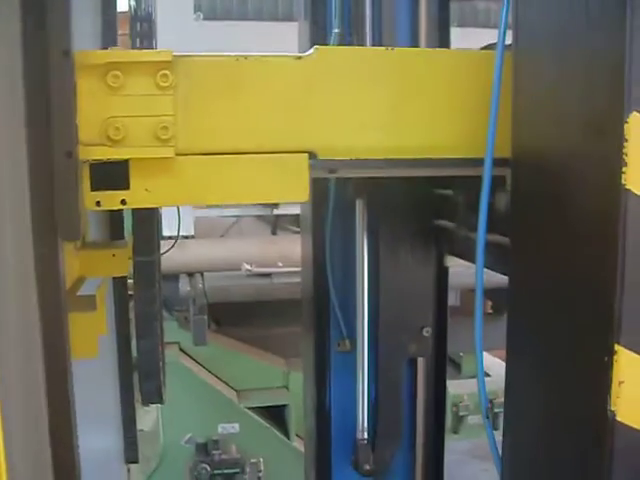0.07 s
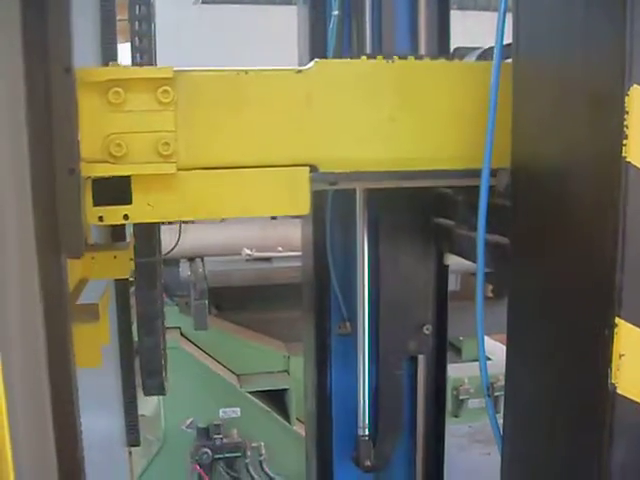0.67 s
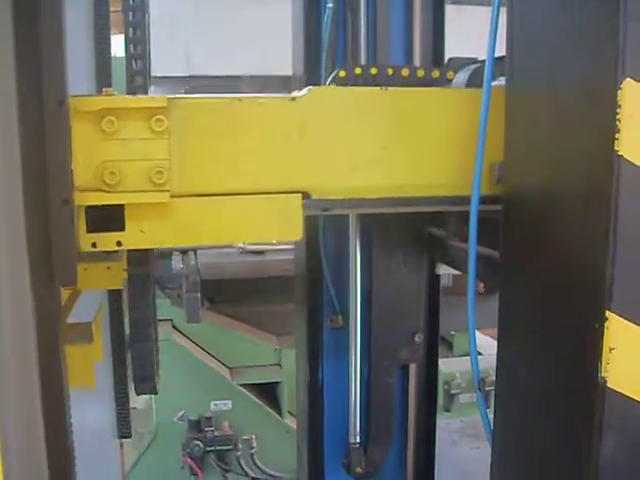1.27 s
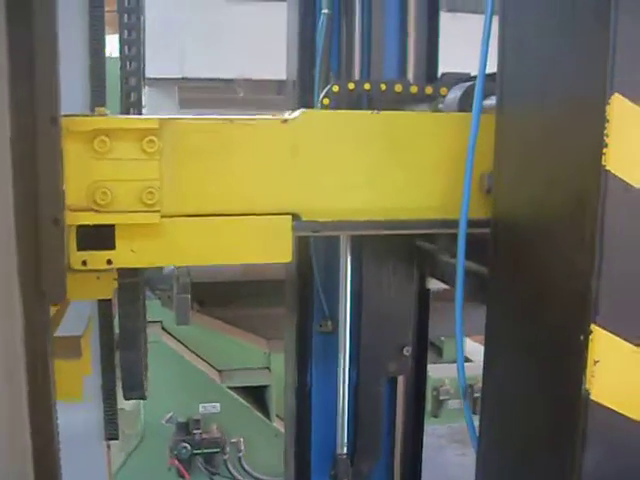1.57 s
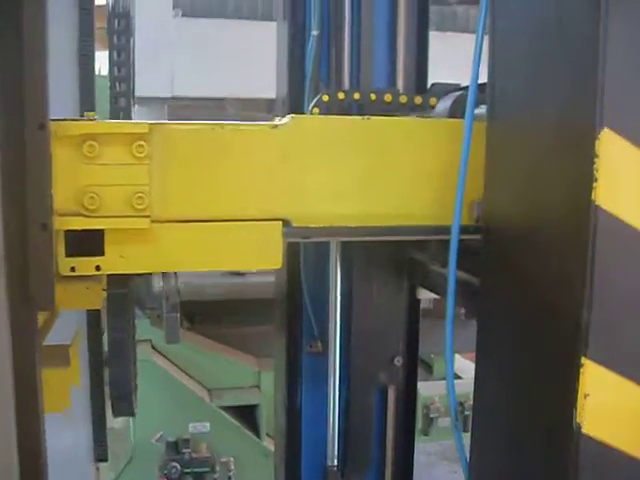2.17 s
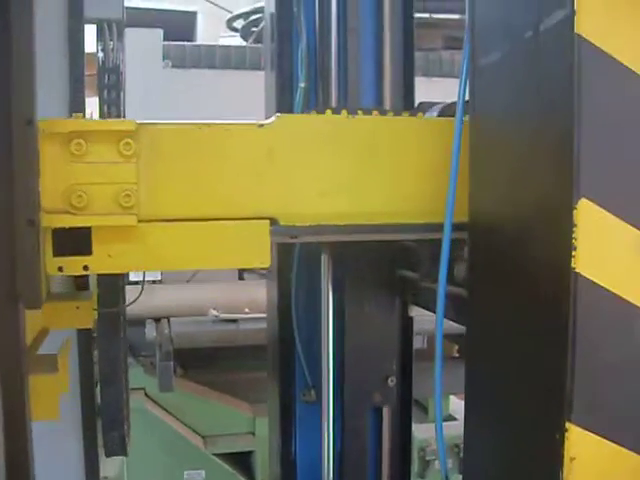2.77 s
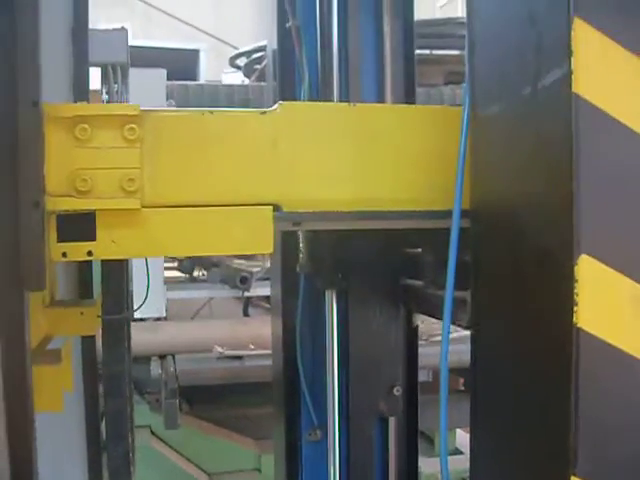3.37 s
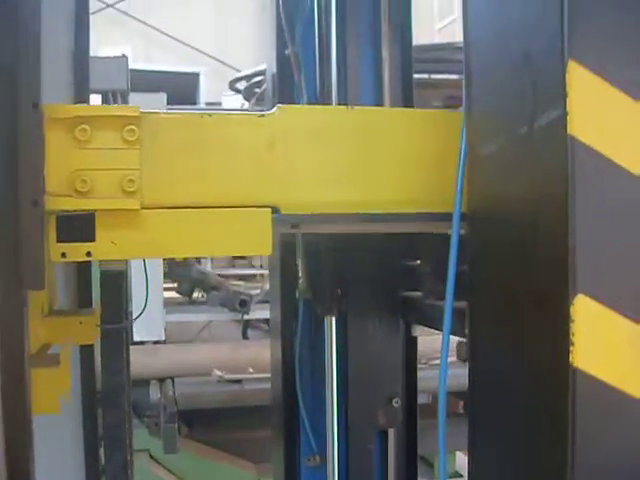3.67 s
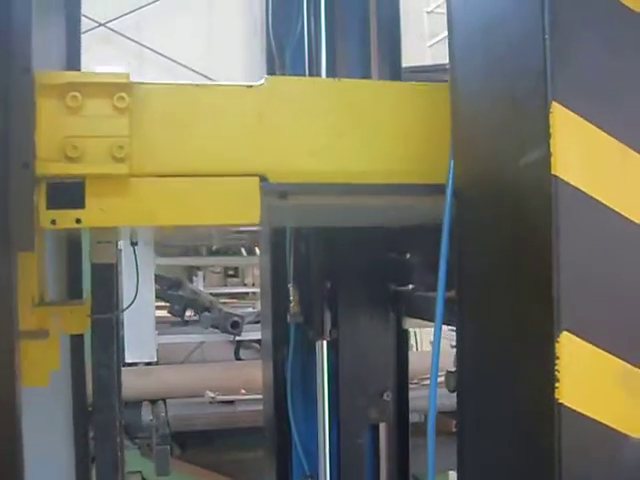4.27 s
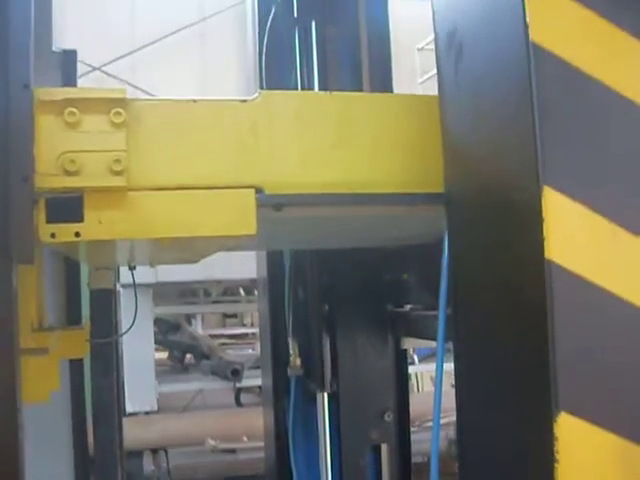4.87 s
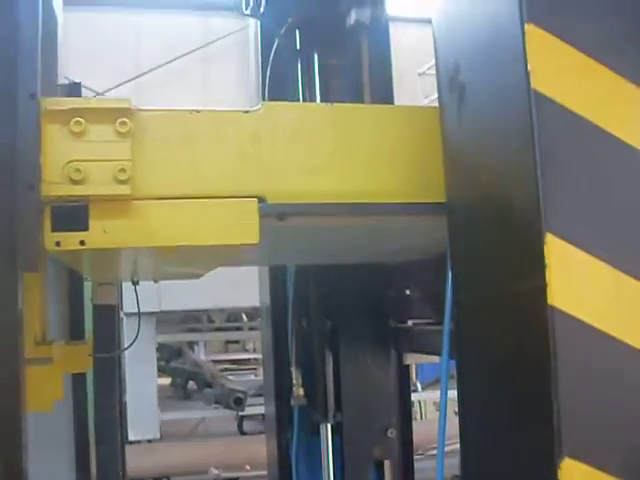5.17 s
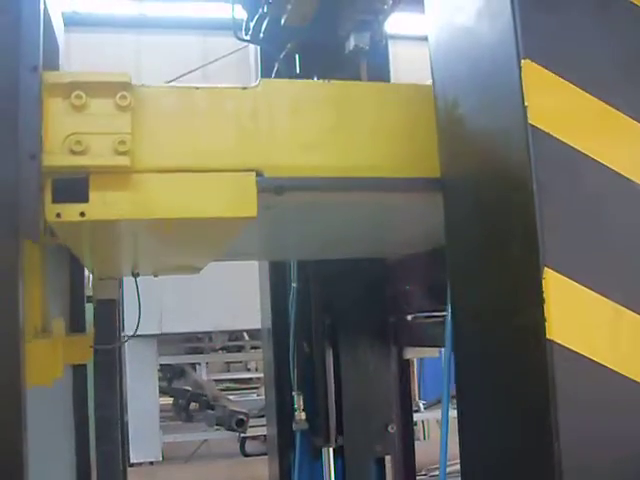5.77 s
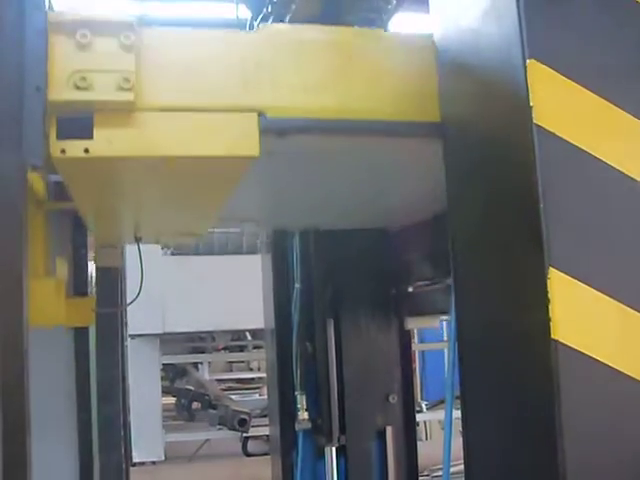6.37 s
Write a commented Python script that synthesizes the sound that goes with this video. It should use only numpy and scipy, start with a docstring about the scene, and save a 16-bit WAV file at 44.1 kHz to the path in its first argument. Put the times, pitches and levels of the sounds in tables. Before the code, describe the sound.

A loud hiss of air escapes an industrial press, followed by a steady pump hum and a couple of metal clunks.

```python
"""Industrial press: air release and ram stroke.

Air vents through a silencer: a loud hiss that dies away, whistling in the exhaust port.
A piston pump hums and rasps over workshop fans, motor tones and a thin drive whine.
From 1.5 s the valves shift with two clunks; a second pump takes the load and oil rushes.
The ram creeps, then rises at full speed, ticking faintly in its guide."""
import sys
import numpy as np
from scipy import signal
from scipy.fft import rfft, irfft, next_fast_len
from scipy.io import wavfile

SR = 44100
rng = np.random.default_rng(int(sys.argv[2]) if len(sys.argv) > 2 else 0)


def generate_wav(sig):
    """Save sig (samples, or channels by samples) to the path in sys.argv[1] as 16-bit PCM at SR."""
    pcm = np.round(np.clip(np.atleast_2d(sig).T, -1, 1) * 32767).astype(np.int16)
    wavfile.write(sys.argv[1], SR, pcm)


N = 283563
TIME = np.arange(N) / SR
FIRST_PUMP_HZ, SECOND_PUMP_HZ = 222.25, 216.1  # nominal piston stroke rates
VALVE_OPEN_S = 2.02


def gain_of(db):
    """Decibels to amplitude."""
    return 10 ** (np.asarray(db) / 20)


def unit_rms(x):
    """Scales to rms 1."""
    return x / np.sqrt(np.mean(x ** 2) + 1e-20)


def curve_at(points, hz):
    """Interpolates (freq_hz, value) points on a log-frequency axis."""
    freqs_hz, values = np.transpose(points)
    return np.interp(np.log(hz + 1), np.log(freqs_hz + 1), values)


def bell(f, hz, width_hz):
    """Gain of a resonance, 1 at its peak."""
    return 1 / (1 + (2 * (f - hz) / width_hz) ** 2)


def ramp(start_s, length_s):
    """Linear rise from 0 to 1."""
    return np.clip((TIME - start_s) / length_s, 0, 1)


def since(start_s):
    """Seconds since start_s; 0 before it."""
    return np.maximum(TIME - start_s, 0)


def add(mix, start_s, sound):
    """Mixes a sound in at start_s."""
    part = mix[round(start_s * SR):][:len(sound)]
    part += sound[:len(part)]


def lowpass(x, hz):
    """Zero-phase low-pass."""
    return signal.sosfiltfilt(signal.butter(2, hz, fs=SR, output="sos"), x)


def colour(x, gain):
    """Filters by a gain per frequency bin; rms 1."""
    return unit_rms(irfft(rfft(x) * gain, len(x)))


def noise(gain_at):
    """Steady noise shaped by gain_at(freq_hz); rms 1."""
    size = next_fast_len(N, real=True)
    spectrum = rng.standard_normal((size // 2 + 1, 2)) @ [1, 1j]
    return unit_rms(irfft(spectrum * gain_at(np.fft.rfftfreq(size, 1 / SR)), size)[:N])


def drift(rate_hz, hop=32):
    """Random wander up to about rate_hz; rms 1."""
    count = N // hop + 2
    f = np.fft.rfftfreq(count, hop / SR)
    slow = colour(rng.standard_normal(count), np.exp(-(f / rate_hz) ** 2))
    return np.interp(np.arange(N) / hop, np.arange(count), slow)


def plate_echoes(x, spread_s, share, count=24):
    """Early echoes between steel plates comb the sound into narrow peaks; rms 1."""
    delays_s, signs = rng.random(count) * spread_s, rng.choice([-1, 1], count)
    echoes = sum(sign * np.roll(x, round(delay_s * SR)) for delay_s, sign in zip(delays_s, signs))
    return unit_rms(x + share / np.sqrt(count) * echoes)


def air_left(from_s=0.62, empty_s=1.0):
    """The last air runs out, 1 to 0."""
    return 1 - ramp(from_s, empty_s - from_s)


def valve_opening(travel_s=0.28):
    """Oil valve position, 0 to 1."""
    return ramp(VALVE_OPEN_S - travel_s, travel_s)


def ram_speed(creep=0.23):
    """Share of full speed: rest, creep as the valve opens, then run-up."""
    return creep * valve_opening() + (1 - creep) * ramp(start_s=3.34, length_s=0.57)


def treble_db(hz, lift_db=1.43, fade_db_per_s=2.5):
    """Machine tones above 1500 Hz stand out at first and fade late in the stroke."""
    return (hz > 1500) * (lift_db - fade_db_per_s * since(4))


def air_jet(level_db=-17.5, drain_db_per_s=72, knee_s=0.075, flutter_db=0.37, sizzle_s=0.025):
    """Turbulence in the silencer: sizzles at full pressure; the treble fades faster than the body."""
    # jet spectrum at full pressure: freq_hz, density_db
    spectrum = [(60, -40), (150, -40), (300, -27), (700, -23.5), (1150, -27), (1450, -18.5), (2600, -12.5),
                (4400, -3), (5500, 1), (6800, -0.9), (8200, -3.5), (9400, 0.5), (10500, -5.5), (11100, -14),
                (11800, -18), (12300, -32)]
    # silencer shell resonances: freq_hz, width_hz, lift_db
    shell = [(3250, 460, 5), (6510, 350, 6), (7080, 220, 4.5), (9050, 300, 1), (10300, 300, 4)]
    jet = noise(lambda f: gain_of(curve_at(spectrum, f) + sum(db * bell(f, hz, w) for hz, w, db in shell)))
    jet = plate_echoes(jet, spread_s=0.05, share=0.51)
    body = lowpass(jet, hz=2400)
    sizzle = 1.4 * (jet - lowpass(jet, hz=10300)) * np.exp(-TIME / sizzle_s)
    fall_db = -drain_db_per_s * TIME ** 2 / (TIME + knee_s)
    hiss = (jet - body + sizzle) * gain_of(fall_db) + body * gain_of(0.47 * fall_db)
    return hiss * air_left() * gain_of(level_db + flutter_db * drift(61))


def port_whistle(peak_db=-28.5, swell_db=3, break_s=0.33, drop_db=4, fade_db_per_s=62, sputter_db=0.9):
    """The jet sputters over the port's edge and sings: swells as the air slows, breaks off, dies."""
    # port resonances: freq_hz, width_hz, relative_db, slow_air_loss_db
    port = [(4920, 380, -7, 2), (5240, 400, -2.5, 3.5), (5350, 420, 2.5, 1.5)]
    slowed = ramp(break_s, 0.09)
    whistle = sum(gain_of(db - loss_db * slowed) * noise(lambda f: bell(f, hz, width_hz))
                  for hz, width_hz, db, loss_db in port)
    whistle = plate_echoes(whistle, spread_s=0.025, share=0.51)
    level_db = peak_db - swell_db * (1 - ramp(0, 0.26))
    level_db -= drop_db * ramp(break_s, 0.031) + fade_db_per_s * since(break_s)
    return whistle * air_left() * gain_of(level_db + sputter_db * drift(60))


def stroke_count(hz, wander):
    """Running count of piston strokes at a slightly unsteady rate."""
    return np.cumsum(hz * (1 + wander * drift(2.54))) / SR


def piston_ripple(strokes, harmonics, waver_db, jitter_rad):
    """Pressure ripple of a pump: harmonics whose balance shifts with ram speed."""
    speed, ripple = ram_speed(), np.zeros(N)
    for k, rest_db, moving_db in harmonics:
        level_db = rest_db + (moving_db - rest_db) * speed + treble_db(k * FIRST_PUMP_HZ)
        level_db += waver_db * drift(7.4)
        phase = 2 * np.pi * (k * strokes + rng.random()) + jitter_rad * drift(25)
        ripple += gain_of(level_db) * np.sqrt(2) * np.cos(phase)
    return ripple


def first_pump(strokes, venting_db=5.5, strain_db=5.5, shift_s=1.52, build_s=0.41, relax_s=0.25):
    """Hum that eases as the air vents, strains until the valve shifts, then relaxes."""
    # ripple before load gain: harmonic, ram_rest_db, ram_moving_db
    harmonics = [(1, -84, -74.5), (2, -72.5, -73.5), (3, -71, -81), (4, -75, -72.5), (5, -80, -87),
                 (6, -75, -71), (8, -69.5, -71.5), (10, -74, -79), (14, -83, -84)]
    strain = ramp(shift_s - build_s, build_s) * np.exp(-since(shift_s) / relax_s)
    load_db = -1 + venting_db * (1 - ramp(0, 1.34)) + strain_db * strain
    return gain_of(load_db) * piston_ripple(strokes, harmonics, waver_db=1.2, jitter_rad=0.28)


def pump_rasp(strokes, level_db=-67, jitter_strokes=0.0074):
    """Strokes tick slightly early or late, smearing the high harmonics into a buzzy hiss."""
    # rasp spectrum: freq_hz, relative_db
    spectrum = [(2500, -20), (4500, -13.5), (5400, 1), (6600, -3.5), (8000, -11), (9600, -12.5),
                (10700, -9)]
    rasp = np.zeros(N)
    for k in range(12, 48):
        cycles = k * (strokes + jitter_strokes * drift(50)) + rng.random()
        rasp += gain_of(curve_at(spectrum, k * FIRST_PUMP_HZ)) * np.cos(2 * np.pi * cycles)
    return gain_of(level_db) * unit_rms(rasp)


def fans(level_db=-61):
    """Steady wash of fans and air in the workshop."""
    # fan spectrum: freq_hz, density_db
    spectrum = [(25, -36), (55, -24), (90, -12), (140, -15.5), (260, -8.5), (400, -11.5), (700, -8),
                (950, -12), (1700, -9), (2500, -14.5), (4500, -15), (7500, -18.5), (10000, -17.5),
                (12000, -34.5)]
    wash = noise(lambda f: gain_of(curve_at(spectrum, f)))
    return gain_of(level_db) * plate_echoes(wash, spread_s=0.04, share=0.46)


def frame_drones():
    """The machinery keeps frame and pipes droning in narrow noise bands."""
    # resonances: freq_hz, width_hz, ram_rest_db, ram_moving_db
    resonances = [(57, 6.7, -80, -84), (337.4, 11, -79.5, -72), (1746, 63, -71.5, -72),
                  (3013, 32, -76, -78.5)]
    speed, drones = ram_speed(), np.zeros(N)
    for hz, width_hz, rest_db, moving_db in resonances:
        swing = drift(width_hz) + 1j * drift(width_hz)
        level_db = rest_db + (moving_db - rest_db) * speed + treble_db(hz)
        drones += gain_of(level_db) * (swing * np.exp(2j * np.pi * hz * TIME)).real
    return drones


def motor_tones():
    """Clean magnetic tones of the motors, louder as the ram speeds up."""
    # tones: pitch_hz, ram_rest_db, ram_moving_db
    tones = [(772.3, -88, -70), (872.3, -82, -72)]
    speed, hum = ram_speed(), np.zeros(N)
    for hz, rest_db, moving_db in tones:
        level_db = rest_db + (moving_db - rest_db) * speed
        hum += gain_of(level_db) * np.sqrt(2) * np.cos(2 * np.pi * (hz * TIME + rng.random()))
    return hum


def drive_whine(level_db=-75, pitch_hz=7867, warble_hz=14.85, warble_rad=0.88):
    """High tone whose phase steps to and fro as the motor drive switches."""
    steps = warble_rad * np.tanh(4 * np.sin(2 * np.pi * warble_hz * TIME))
    return gain_of(level_db) * np.sqrt(2) * np.cos(2 * np.pi * pitch_hz * TIME + steps)


def steel_burst(gain, rise_s, t60_s):
    """Crowded modes of struck heavy steel: 1 s of noise that swells and dies."""
    t = TIME[:SR]
    envelope = np.minimum(t / rise_s, 1) * gain_of(-60 * np.maximum(t - rise_s, 0) / t60_s)
    return colour(rng.standard_normal(SR), gain) * envelope


def steel_mode(hz, t60_s):
    """One decaying tone of a struck part, 1 s long."""
    t = TIME[:SR]
    return np.sqrt(2) * gain_of(-60 * t / t60_s) * np.sin(2 * np.pi * hz * t)


def valve_clacks():
    """Valve and latch strike: each crack rings the same steel modes."""
    # strikes: start_s, level_db, t60_s, tilt_db_per_octave, relative_ring_db
    strikes = [(1.547, -53.5, .07, 5, -16), (1.569, -50, .1, -1.5, -18), (1.594, -50, .08, -3, -7),
               (1.65, -51, 0.054, -4, -16), (1.682, -58, .06, -6, -18), (1.716, -59, .08, 3, -20),
               (1.943, -49, .09, 6.5, -20), (1.9609, -40, 0.15, 1.5, -12), (1.995, -48.5, 0.28, -2.5, -22),
               (2.207, -49, .06, -2, -24)]
    # crack spectrum: freq_hz, density_db
    spectrum = [(100, -11), (400, 3), (900, 0), (1600, 2.5), (3000, 6.5), (4500, 2.5), (6300, 5),
                (8000, -9.5), (10500, -9), (12000, -38)]
    # steel modes: pitch_hz, relative_db, t60_s
    modes = [(450, -10, 0.43), (1547, -6, 0.24), (2280, -17, 0.18), (2550, 0.5, 0.13), (2891, -15, 0.31),
             (3677, -11, 0.25), (4143, 4, 0.089), (6050, -13, .45), (6170, -18, .4)]
    clacks, f = np.zeros(N), np.fft.rfftfreq(SR, 1 / SR)
    for start_s, level_db, t60_s, tilt_db, ring_db in strikes:
        tilted_db = curve_at(spectrum, f) + tilt_db * np.log2(f + 1)
        crack = steel_burst(gain_of(tilted_db), rise_s=0.002, t60_s=t60_s)
        ring = sum(rng.choice([-1, 1]) * gain_of(db) * steel_mode(hz, ring_s) for hz, db, ring_s in modes)
        add(clacks, start_s, gain_of(level_db) * (crack + gain_of(ring_db) * ring))
    return clacks


def frame_jolts():
    """The press frame jolts: dull thuds, each with one broad resonance."""
    # jolts: start_s, level_db, rise_s, t60_s, pitch_hz
    jolts = [(1.595, -48.5, 0.0063, 0.52, 485), (1.63, -44, 0.014, 0.35, 170),
             (1.961, -45, 0.0058, 0.12, 420), (1.995, -47.5, 0.0044, 0.25, 350)]
    # thud spectrum: freq_hz, density_db
    spectrum = [(40, -7), (90, 0), (175, 2), (300, 1), (600, -2.5), (1000, -6.5), (2000, -4), (3200, -17),
                (6000, -29), (12000, -49)]
    thuds, f = np.zeros(N), np.fft.rfftfreq(SR, 1 / SR)
    for start_s, level_db, rise_s, t60_s, hz in jolts:
        resonance = 1 + 1.7 * bell(f, hz, width_hz=0.6 * hz)
        bass_cut = f ** 2 / (f ** 2 + (0.74 * hz) ** 2)
        gain = gain_of(curve_at(spectrum, f)) * resonance * bass_cut
        add(thuds, start_s, gain_of(level_db) * steel_burst(gain, rise_s, t60_s))
    return thuds


def hall(x, wet_db, reflections_per_s=2000):
    """Adds the workshop's tail: sparse reflections, each band decaying at its own rate."""
    # reverberation: freq_hz, t60_s
    decay = [(100, 1.4), (1000, 2.2), (5000, 1.5), (11000, 0.73)]
    taps = rng.choice([-1., 1.], SR) * (rng.random(SR) < reflections_per_s / SR)
    hz, t, bands = signal.stft(taps, SR, nperseg=256)
    bands *= gain_of(-60 * t / curve_at(decay, hz)[:, None])
    tail = signal.istft(bands, SR, nperseg=256)[1]
    return x + gain_of(wet_db) * signal.fftconvolve(x, tail / np.linalg.norm(tail))[:N]


def second_pump():
    """Hum that comes in with the valve; its speed sags under load."""
    # ripple: harmonic, ram_rest_db, ram_moving_db
    harmonics = [(1, -83, -76.5), (2, -71.5, -62), (3, -81, -78.5), (4, -74.5, -77), (6, -83, -76),
                 (8, -72.5, -68), (16, -78.5, -81)]
    sag = np.interp(TIME, [2, 4], [1.003, 1])
    strokes = stroke_count(SECOND_PUMP_HZ * sag, wander=0.00056)
    return valve_opening() * piston_ripple(strokes, harmonics, waver_db=1.54, jitter_rad=0.27)


def oil_rush(strokes, level_db=-60.5, surge_db=3.5, surge_s=0.15, speed_db=1, settle_db_per_s=1.5):
    """Oil surges through the opened valve and throbs with the pistons; its rumble slowly settles."""
    # flow spectrum: freq_hz, density_db
    spectrum = [(50, -41), (85, -13.5), (120, 0.5), (165, -3), (220, -1), (350, -1.5), (580, 3.5),
                (950, -9), (1600, -4.5), (2600, -12), (4500, -18.5), (9500, -16.5), (12000, -37)]
    oil = plate_echoes(noise(lambda f: gain_of(curve_at(spectrum, f))), spread_s=0.033, share=0.51)
    open_s = since(VALVE_OPEN_S)
    rumble_db = 3 - settle_db_per_s * open_s
    oil += lowpass(oil, hz=138) * (gain_of(rumble_db) - 1)
    throb = 1 + 0.18 * np.cos(4 * np.pi * strokes)
    flow_db = level_db + surge_db * np.exp(-open_s / surge_s) + speed_db * ram_speed()
    return valve_opening() ** 4 * oil * throb * gain_of(flow_db + 0.5 * drift(9.7))


def guide_ticks():
    """The rising ram ticks faintly in its guide."""
    # contacts: start_s, level_db
    contacts = [(5.185, -65), (5.43, -60), (5.795, -62), (6.255, -63)]
    resonance = bell(np.fft.rfftfreq(SR, 1 / SR), hz=4115, width_hz=230)
    ticks = np.zeros(N)
    for start_s, level_db in contacts:
        add(ticks, start_s, gain_of(level_db) * steel_burst(resonance, rise_s=0.003, t60_s=0.07))
    return ticks


def scene():
    """Mono mix; only the impacts ring in the hall."""
    air = air_jet() + port_whistle()
    strokes = stroke_count(FIRST_PUMP_HZ, wander=0.000391)
    pump = first_pump(strokes) + pump_rasp(strokes)
    workshop = fans() + frame_drones() + motor_tones() + drive_whine()
    impacts = hall(valve_clacks() + frame_jolts() + guide_ticks(), wet_db=-8.5)
    lift = second_pump() + oil_rush(strokes)
    return (air + pump + workshop + impacts + lift)[None]


def record(dry):
    """Steep low-pass at 12280 Hz."""
    taps = signal.firwin(511, 12280, window=("kaiser", 9), fs=SR)
    return signal.oaconvolve(dry, taps[None], "same")


dry = scene()
out = record(dry)
generate_wav(out)
```